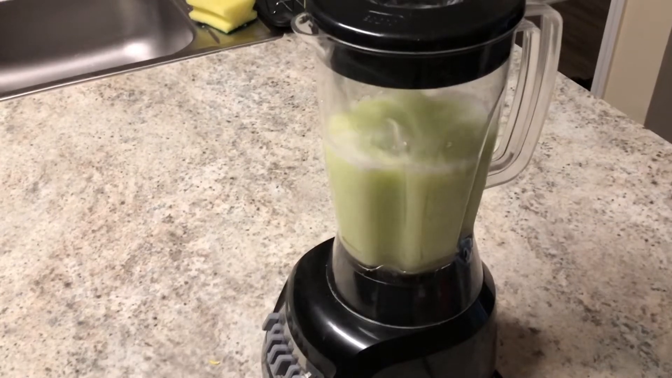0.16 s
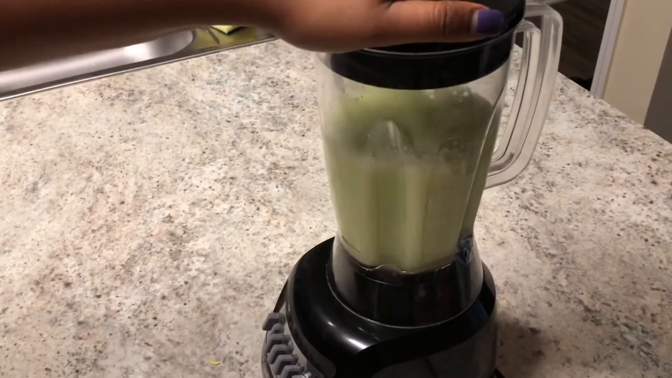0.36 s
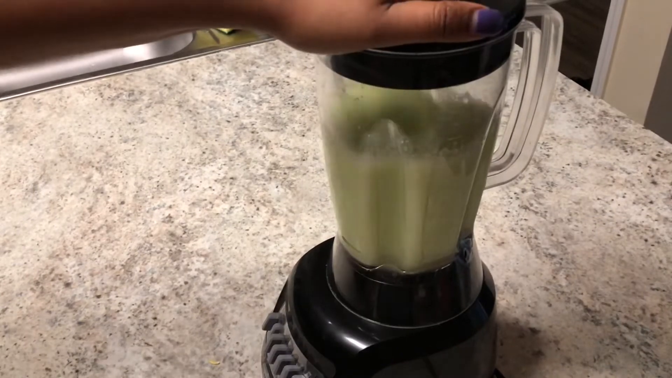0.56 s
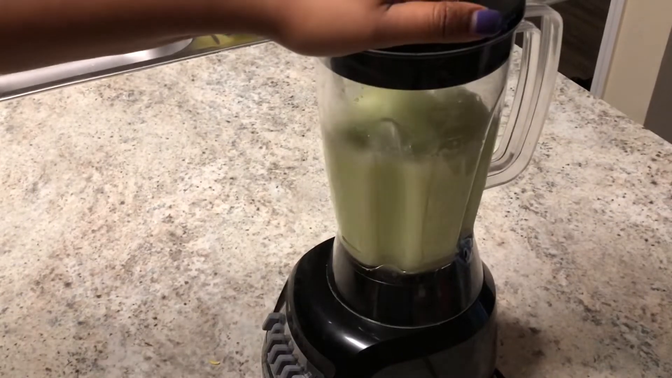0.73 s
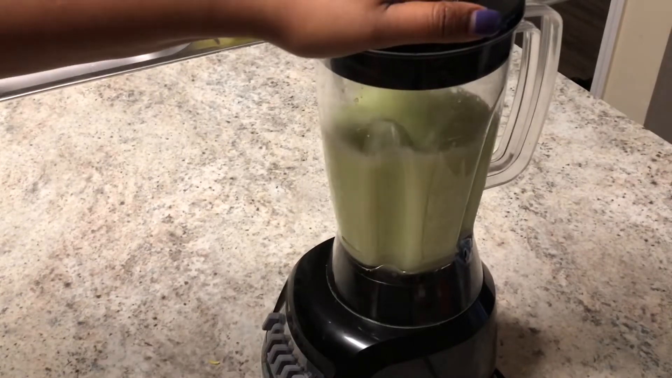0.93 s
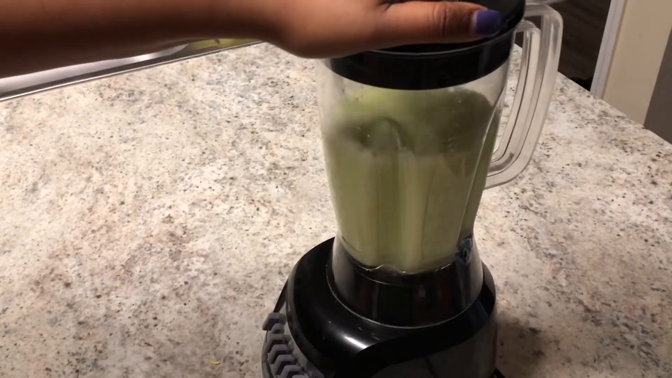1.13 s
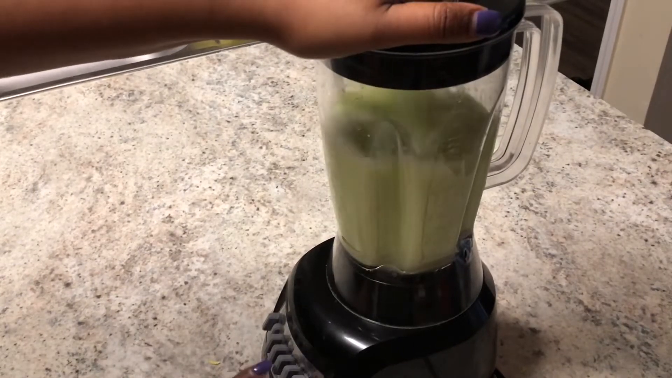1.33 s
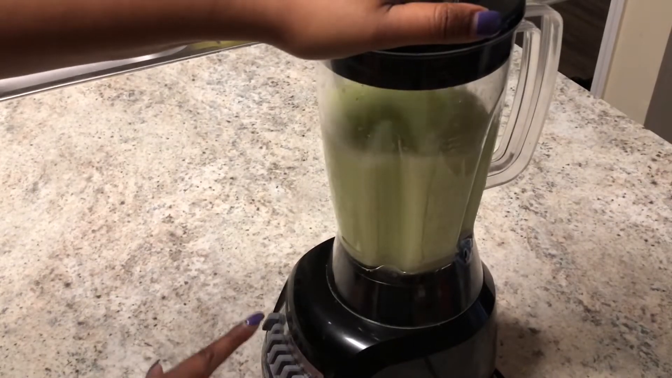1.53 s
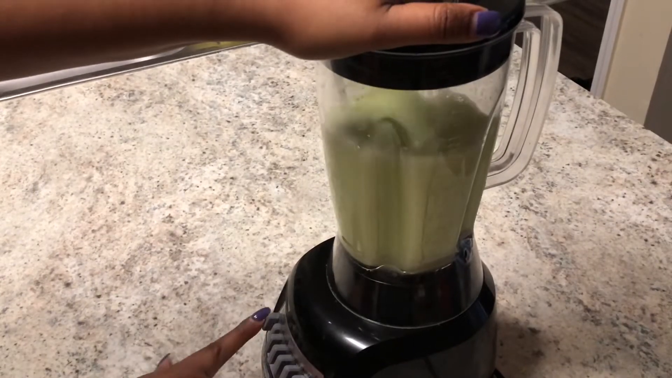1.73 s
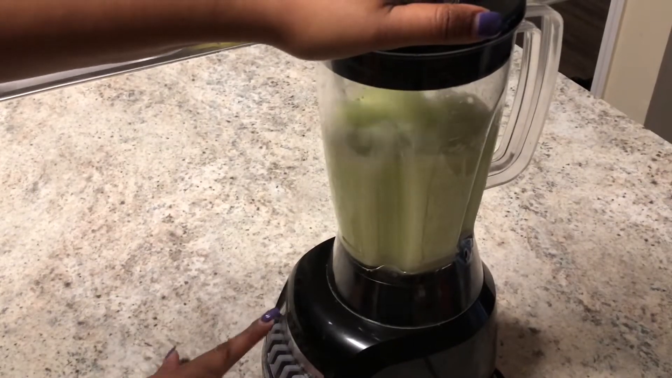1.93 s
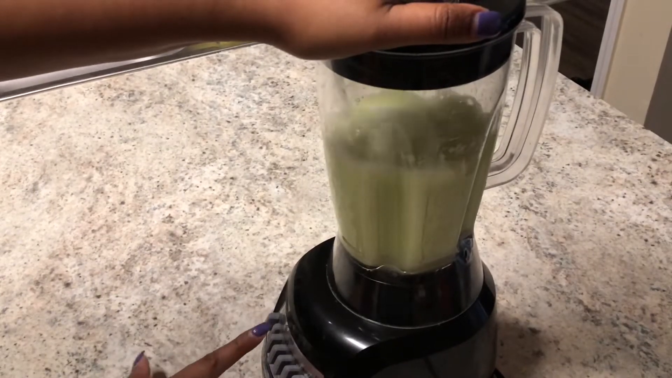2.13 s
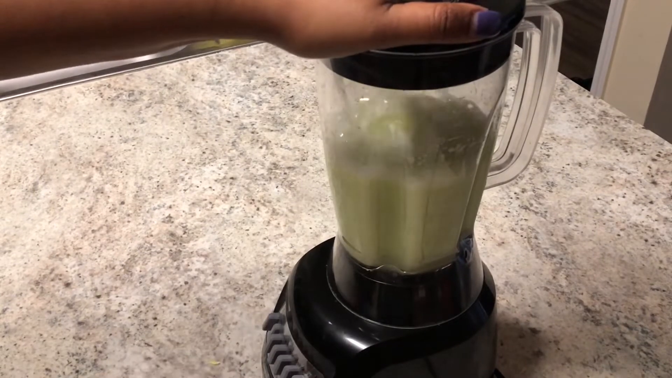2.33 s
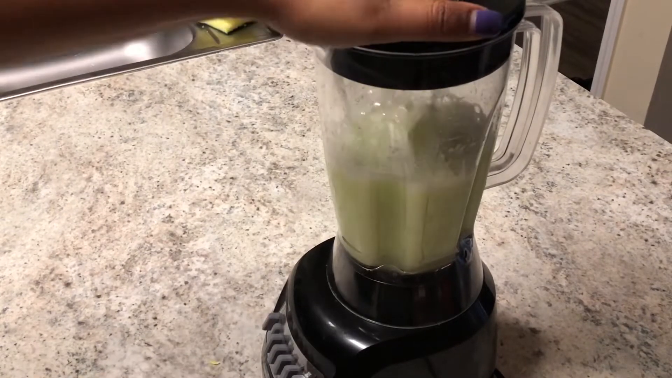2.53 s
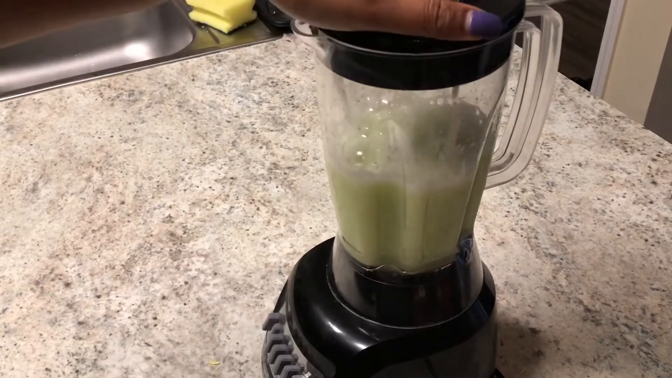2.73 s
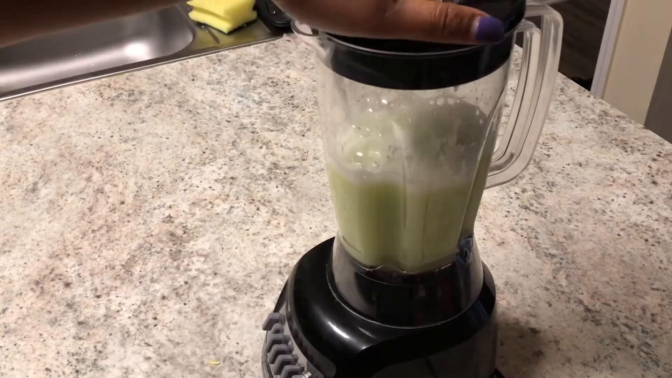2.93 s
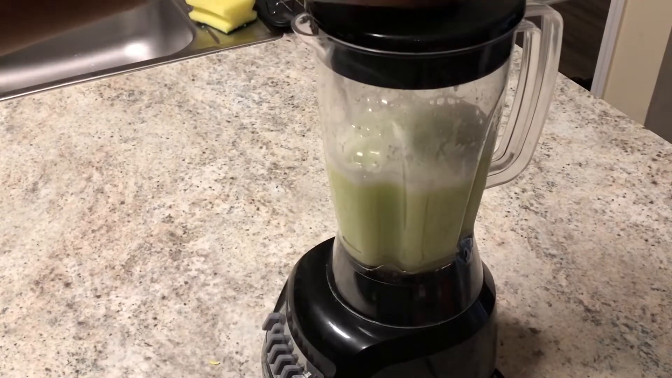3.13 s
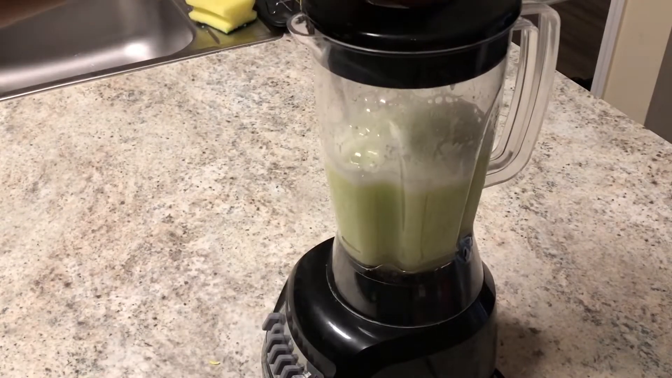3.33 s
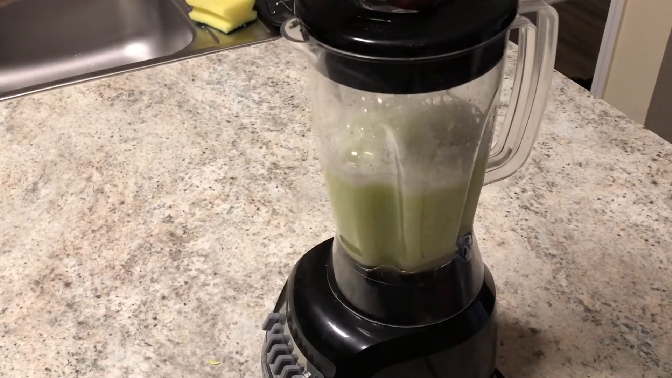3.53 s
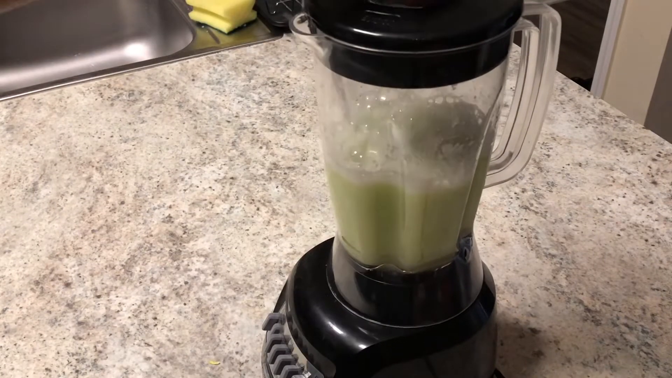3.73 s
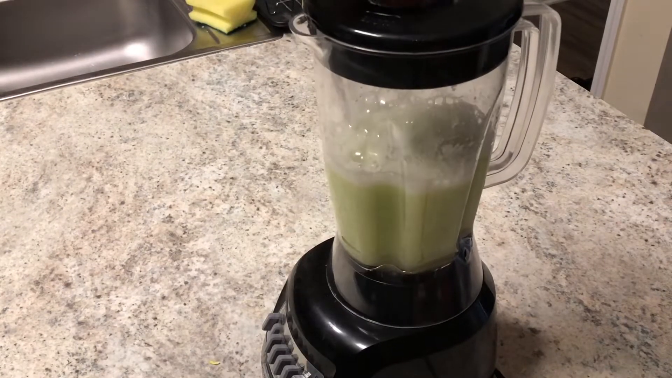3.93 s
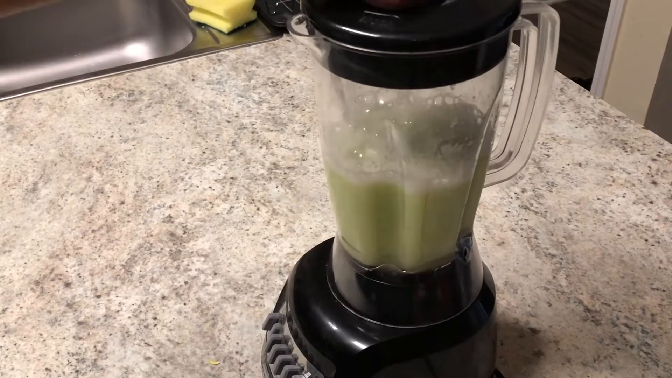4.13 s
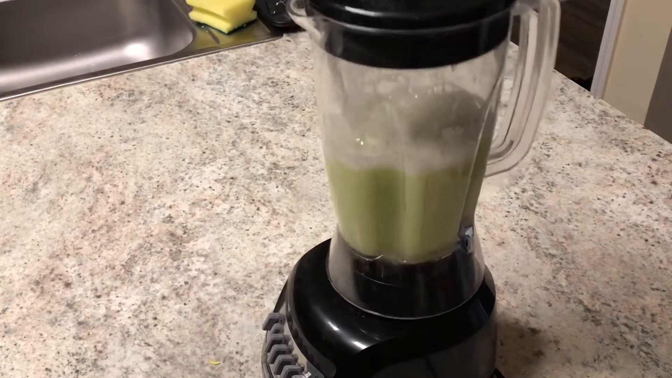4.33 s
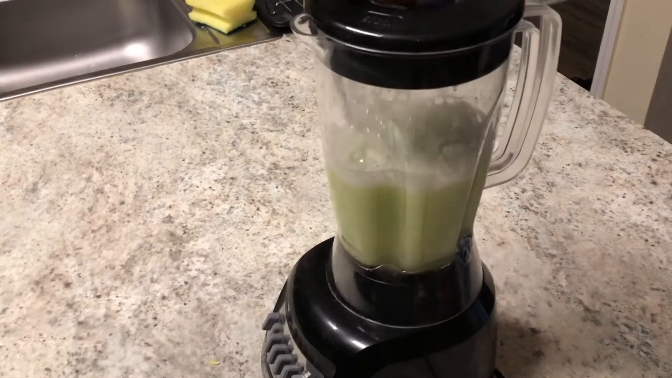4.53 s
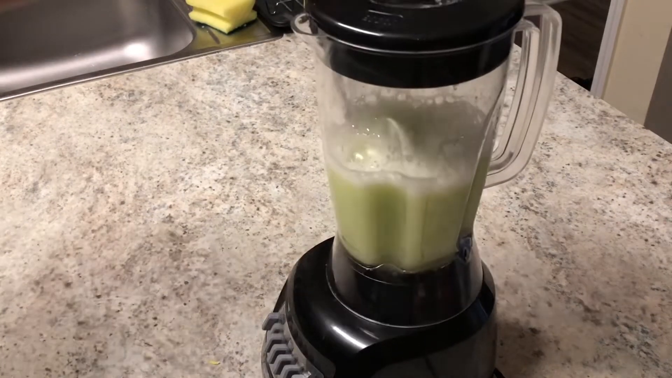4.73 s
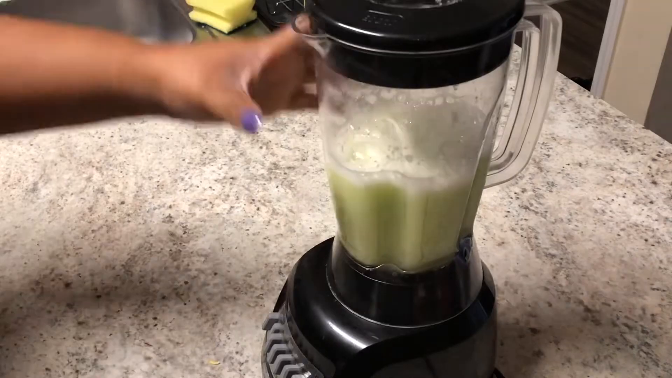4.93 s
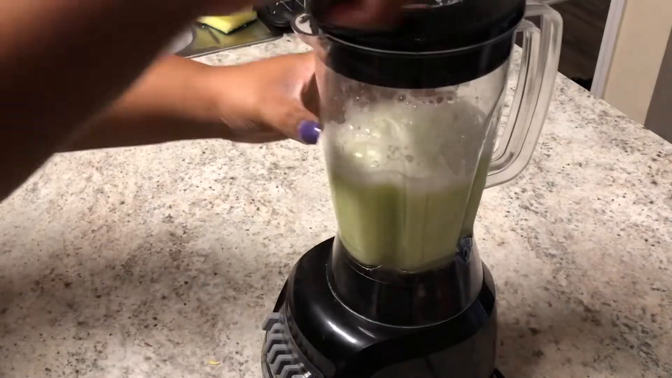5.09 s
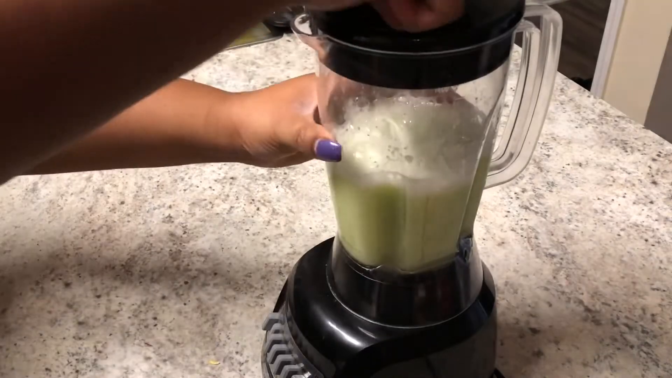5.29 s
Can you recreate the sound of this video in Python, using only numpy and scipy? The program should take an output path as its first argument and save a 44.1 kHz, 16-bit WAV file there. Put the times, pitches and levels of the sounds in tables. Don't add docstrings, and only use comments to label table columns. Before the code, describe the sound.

Silence for about 0.35 s, then a very quick fade into a blender at full speed: a rough motor drone near 400 turns a second with buzzing overtones and a high whine, beneath broad wet churning, spray and fan hiss. The load wavers slightly; tiny celery cracks pepper the jar, a few larger around 0.75-0.97 s. At 1.97 s the off button snaps, bright and very loud. The motor glides steeply down in pitch, brushes scraping, and the base rattles to rest by about 2.5 s. The level drops to faint refrigerator hum and room air. Lid clacks and a hollow knock come around 2.5-2.6 s, light nail ticks near 3.2-3.4 s, busier handling from 3.8 s, with a brief metallic ting. The strongest clunk lands at 4.5 s, followed by small taps, a soft bright rub at 5.1 s and final knocks near 5.2-5.4 s. Close single microphone, short kitchen reverberation.

```python
import sys
import numpy as np
from scipy import signal
from scipy.fft import rfft, irfft, next_fast_len
from scipy.io import wavfile
from scipy.ndimage import uniform_filter1d, map_coordinates

SR = 44100
rng = np.random.default_rng(int(sys.argv[2]) if len(sys.argv) > 2 else 0)


def bounce(signal):
    frames = np.transpose(np.atleast_2d(signal))
    limited = np.clip(frames, -1, 1)
    pcm = np.round(limited * 32767).astype(np.int16)
    wavfile.write(sys.argv[1], SR, pcm)


def decibels_to_gain(level_db):
    exponent = np.asarray(level_db, float) / 20
    return 10 ** exponent


N = 240684

# [t/s, peak level/dB]
SWITCH_OFF = [
    (1.9737, -1),
]
OFF_S = SWITCH_OFF[0][0]
RUN_HZ = 394
TORQUE_HZ = 120
SLOSH_LAW = (-33, 0.75, 1.71)


def unit(x):
    return x / np.sqrt(np.mean(x ** 2) + 1e-20)


def along(points, hz):
    f, v = np.transpose(points)
    return np.interp(np.log(hz + 1), np.log(f + 1), v)


def curves(rows):
    s, *cols = np.transpose(rows)
    return [np.interp(np.arange(N) / SR, s, c) for c in cols]


def wobble(rate_hz):
    knots = rng.standard_normal(int(N * rate_hz / SR) + 4)
    return map_coordinates(knots, [np.arange(N) * rate_hz / SR])


def filtered(x, response):
    m = next_fast_len(len(x) + 8192)
    return irfft(rfft(x, m) * response(np.fft.rfftfreq(m, 1 / SR)), m)[:len(x)]


def band(hz, low_hz, high_hz):
    return 1 / np.sqrt((1 + (low_hz / (hz + 1)) ** 8) * (1 + (hz / high_hz) ** 8))


def rush(response, patchy_db):
    z = signal.stft(rng.standard_normal(N), nperseg=512)[2]
    field = uniform_filter1d(rng.standard_normal(z.shape), size=6, axis=0)
    field = uniform_filter1d(field, size=12, axis=1)
    noise = signal.istft(z * decibels_to_gain(patchy_db * unit(field)), nperseg=512)[1][:N]
    return unit(filtered(noise, response))


def damped(t, t60, low_hz, high_hz):
    noise = filtered(rng.standard_normal(len(t)), lambda hz: band(hz, low_hz, high_hz))
    return decibels_to_gain(-60 * t / t60) * unit(noise)


def ring(t, hz, t60):
    return decibels_to_gain(-60 * t / t60) * np.sin(2 * np.pi * hz * t)


def add(track, s, sound):
    part = track[round(s * SR):][:len(sound)]
    part += sound[:len(part)]


def kitchen(sound, wet_db):
    # [f/Hz, t60/s]
    decay = [(200, 0.16), (1500, 0.18), (4000, 0.15), (8000, 0.12), (14000, 0.07)]
    hz, t, z = signal.stft(rng.standard_normal(SR // 3), SR, nperseg=256)
    tail = signal.istft(z * decibels_to_gain(-60 * t / along(decay, hz)[:, None]), SR, nperseg=256)[1]
    wet = signal.fftconvolve(np.pad(sound, (150, 0)), tail / np.linalg.norm(tail))
    return decibels_to_gain(wet_db) * wet + np.pad(sound, (0, len(wet) - len(sound)))


def coasting():
    drag_s, friction_hz = .5, 106
    since = np.maximum(np.arange(N) / SR - OFF_S, 0)
    return np.maximum((RUN_HZ + friction_hz) * np.exp(-since / drag_s) - friction_hz, 5)


def shaft():
    # [t/s, speed/Hz]
    powered_speed = [(.38, 399), (.43, 400), (.5, 393), (.61, 391), (.68, 397), (.77, 402), (.84, 399),
                     (.91, 393), (1.0, 395), (1.08, 403), (1.16, 402), (1.23, 395), (1.31, 393),
                     (1.44, 401), (1.53, 394), (1.63, 390), (1.78, 402), (1.88, 391), (1.97, 394)]
    time = np.arange(N) / SR
    speed = np.where(time < OFF_S, curves(powered_speed)[0], coasting())
    speed = uniform_filter1d(speed, size=700)
    return speed, 2 * np.pi * np.cumsum(speed) / SR


def flow_db(level_db, load_share, growth):
    # [t/s, load/dB]
    load = [
        (.385, -0.5),
        (.43, 0.5),
        (.6, 0),
        (.82, 0.5),
        (.87, -0.5),
        (1.33, 1),
        (1.52, -1),
        (1.97, -1.5),
    ]
    return level_db + load_share * curves(load)[0] + growth * 20 * np.log10(coasting() / RUN_HZ)


def beat(turn_depth, torque_depth, double_depth):
    time = np.arange(N) / SR
    mains = 2 * np.pi * TORQUE_HZ * time
    torque = torque_depth * np.cos(mains) + double_depth * np.cos(2 * mains)
    return 1 + turn_depth * np.cos(shaft()[1]) + torque * (time < OFF_S)


def room():
    # [f/Hz, level/dB rms]
    fridge = [(118.4, -78), (323.0, -87.5), (651.4, -77.5), (1954, -92), (2439, -100), (2606, -97)]
    # [f/Hz, density/dB per Hz]
    quiet = [(30, -11), (60, -12.5), (85, -10), (105, -12), (140, -12), (200, -7.5), (330, -5), (500, -9.5),
             (650, -7.5), (850, -12.5), (1250, -13.5), (2500, -19.5), (6000, -31.5), (16200, -37.5)]
    # [t/s, half length/s, level/dB, brightness/dB]
    strokes = [(2.598, .08, -73.5, 6), (2.98, .025, -77.5, 6), (3.315, 0.018, -74, 7),
               (3.3, 0.23, -83, -14), (3.432, 0.016, -80, -16), (3.514, 0.033, -72, -4),
               (3.854, 0.086, -75.5, -9.5), (4.23, 0.013, -71, -2), (4.285, .12, -82, -20),
               (4.529, 0.06, -60.5, -10.5), (4.865, .06, -82, -11), (5.071, 0.12, -68, 18.5),
               (5.214, 0.076, -79, -9.5), (5.46, 0.11, -72.5, -7)]
    time = np.arange(N) / SR

    def line(hz, db):
        return decibels_to_gain(db + 7.0 + .8 * wobble(15)) * np.sin(2 * np.pi * hz * time + .25 * wobble(6.3))

    def stroke(lean):
        return sum(decibels_to_gain(db + lean * bright_db) * np.exp(-((time - s) / half_s) ** 2)
                   for s, half_s, db, bright_db in strokes)

    def layer(low_hz, high_hz, patchy_db=2.2):
        return rush(lambda hz: decibels_to_gain(along(quiet, hz)) * band(hz, low_hz, high_hz), patchy_db)

    hum = sum(line(hz, db) for hz, db in fridge)
    air = decibels_to_gain(-70.0) * layer(15, 1200) + decibels_to_gain(-75.5) * layer(1300, 5000) + decibels_to_gain(-79) * layer(5000, 16000)
    rub = stroke(-0.9) * layer(110, 1120)
    rub = rub + stroke(0) * layer(1840, 5000, patchy_db=1.0)
    rub = rub + decibels_to_gain(-3.0) * stroke(0.3) * layer(4900, 16000, patchy_db=2.0)
    return hum + air + rub


def motor():
    # [t/s, level/dB]
    whine_curve = [(.39, -54), (.42, -40), (.6, -41), (.645, -55), (.68, -40), (.8, -45), (.85, -55),
                   (.91, -44), (.99, -53), (1.04, -41), (1.16, -43), (1.3, -43), (1.36, -52), (1.44, -47),
                   (1.5, -54), (1.62, -39), (1.67, -54), (1.82, -52), (1.89, -41), (1.97, -46)]
    # [t/s, pulp unbalance (1st)/dB, blade pair (2nd)/dB]
    low_orders = [(.38, -47.5, -43), (.43, -53, -43), (.56, -38.5, -34), (.65, -48, -50), (.69, -49, -36.5),
                  (.79, -47.5, -41), (.85, -54, -41), (.91, -37.5, -38), (1.0, -50, -39),
                  (1.07, -40.5, -35), (1.16, -44, -39), (1.21, -53, -34.5), (1.29, -40, -33.5),
                  (1.5, -57, -42), (1.6, -35.5, -41), (1.7, -41, -49), (1.8, -42.5, -37),
                  (1.88, -38.5, -42.5)]
    # [order, level re 3rd/dB]
    overtones = [(4, -0.5), (5, -7), (6, -3), (7, -7), (8, -5), (9, -8)]
    # [order, side, level/dB]
    sidebands = [(1, -1, -50), (1, 1, -51), (2, -1, -51), (2, 1, -47), (3, -1, -49)]
    # [order, level/dB]
    coast_orders = [(2, -2), (3, -2), (4, -4), (5, -10), (6, -12), (7, -13), (8, -14), (10, -14)]
    # [f/Hz, level/dB]
    housing = [(70, -80), (96, -68), (107, -67), (125, -58), (154, -62), (181, -54), (196, -44), (212, -42),
               (228, -47), (245, -55), (265, -44), (300, -38), (323, -45), (345, -34), (375, -33),
               (400, -38)]
    # [f/Hz, level/dB]
    shell = [(200, -50), (300, -52), (480, -52), (540, -49), (590, -42), (640, -37), (700, -37), (740, -45),
             (790, -38), (860, -43), (950, -47), (1150, -44), (1400, -48), (1750, -37), (2400, -38),
             (3000, -38), (3700, -27)]
    time = np.arange(N) / SR
    whine_db, = curves(whine_curve)
    first_db, second_db = curves(low_orders)
    speed, turn = shaft()

    def tone(k, shake_rad):
        return np.sqrt(2) * np.sin(k * turn + shake_rad * wobble(29.97))

    def flutter():
        return decibels_to_gain(2.5 * wobble(13))

    def sideband(k, side, db):
        phase = k * turn + side * 2 * np.pi * TORQUE_HZ * time + 0.6 * wobble(25)
        return decibels_to_gain(db) * flutter() ** 1.5 * np.sin(phase)

    first = decibels_to_gain(first_db) * tone(1, .35) * decibels_to_gain(1.3 * wobble(28))
    second = decibels_to_gain(second_db - 1 + 2.2 * wobble(22)) * tone(2, 0.87)
    upper = tone(3, 0.95) * flutter() + sum(decibels_to_gain(db) * tone(k, 1.0) * flutter() for k, db in overtones)
    whine = decibels_to_gain(whine_db - 1 + 2 * wobble(18)) * tone(10, 0.3)
    beats = sum(sideband(*row) for row in sidebands)
    loaded = first + second + decibels_to_gain(-53) * upper + whine + beats

    higher = sum(decibels_to_gain(db + along(shell, k * speed)) * tone(k, 0.045 * k) * flutter() ** 0.43
                 for k, db in coast_orders)
    fading = decibels_to_gain(-14 * np.maximum(time - OFF_S, 0)) * np.clip((2.52 - time) / 0.092, 0, 1)
    free = decibels_to_gain(along(housing, speed)) * tone(1, 0.18) * decibels_to_gain(1.5 * wobble(25)) + fading * higher
    powered = np.clip((OFF_S - time) / .02 + .5, 0, 1)
    return powered * loaded + (1 - powered) * free * np.clip((2.53 - time) / 0.11, 0, 1)


def churn():
    # [f/Hz, density/dB per Hz]
    body_points = [(25, -93), (60, -70), (80, -61), (110, -23.5), (200, -11.5), (334, -9.5), (389, -6),
                   (433, -10), (622, -5.5), (800, -4), (1000, -8), (1290, -20), (1500, -15.5),
                   (1950, -41.5), (3300, -120)]
    slosh_points = [(590, -52.5), (1000, -0.5), (1300, -4), (1560, 0.5), (2130, 0), (3060, -4.5),
                    (3880, -2), (4220, -11), (6000, -10), (7800, -21), (13200, -120)]
    spray_points = [(2650, -41.5), (4500, -2), (5340, -2), (5980, -2.5), (7290, -1), (8300, -5),
                    (10500, -30), (14000, -120)]
    fan_points = [(5500, -120), (7500, -13.5), (9080, -0.5), (9790, 0), (12500, -1.5), (15100, -1),
                  (16200, -14)]
    # [f/Hz, width/Hz, lift/dB]
    jar = [(610, 57, 5.5), (660, 44, 1.5), (710, 30, 0.5), (860, 33, 3.5), (1010, 45, 2.5),
           (2110, 100, 2.5), (2430, 30, 2.5), (2800, 140, 6), (3216, 40, 4), (3480, 120, 2), (4670, 36, 4),
           (5027, 60, 4), (5450, 91, 6), (7100, 320, -1)]

    def lift(hz):
        return decibels_to_gain(sum(db / (1 + (2 * (hz - c) / w) ** 2) for c, w, db in jar))

    def layer(points, patchy_db):
        return rush(lambda hz: decibels_to_gain(along(points, hz)) * lift(hz), patchy_db)

    surge = wobble(40)
    body_db = flow_db(-33, 1.4, 1.14) - 2.5 + 0.73 * wobble(20)
    slosh_db = flow_db(*SLOSH_LAW) + 0.4 * surge + 0.41 * wobble(300)
    spray_db = flow_db(-35, .4, 2.4) + 0.2 * surge + 0.82 * wobble(300)
    fan_db = flow_db(-37, 1.5, 2.1) + 0.4 * wobble(9)
    body = decibels_to_gain(body_db) * layer(body_points, patchy_db=0.0)
    slosh = decibels_to_gain(slosh_db) * beat(.2, .08, .1) * layer(slosh_points, patchy_db=0.5)
    spray = decibels_to_gain(spray_db) * layer(spray_points, patchy_db=1.3)
    fan = decibels_to_gain(fan_db) * beat(.17, .07, 0) * layer(fan_points, patchy_db=1.36)
    return (body + slosh + spray + fan) * np.clip((2.6 - np.arange(N) / SR) / 0.14, 0, 1)


def chunks():
    # [t/s, peak level/dB]
    large = [
        (0.7585, -24),
        (0.9053, -20),
        (0.9316, -24),
        (0.9644, -22),
    ]
    t, cracks = np.arange(160) / SR, np.zeros(N)
    slosh_db = flow_db(*SLOSH_LAW)
    draw = rng.random((420, 3))
    times_s = .36 + 2.2 * draw[:, 0]
    small = [(s, slosh_db[int(s * SR)] + 3.5 - 2.2 * np.log(u + .01)) for s, u in zip(times_s, draw[:, 1])]
    for (s, db), u in zip(list(large) + small, draw[:, 2]):
        hz = 2600 * decibels_to_gain(12 * (u - .5))
        add(cracks, s, decibels_to_gain(db - 0.5 - 60 * t / 0.0016) * np.cos(2 * np.pi * hz * t))
    return cracks


def switch():
    # [f/Hz, level/dB, t60/s]
    button = [(1790, -9, 0.0089), (2000, -6, 0.0099), (3060, -2, 0.011), (3490, -3.5, .01),
              (5340, -3, 0.0058), (5940, 0.5, 0.0059), (6800, -1, 0.006), (9000, -6, 0.0059),
              (11000, -9, 0.006), (12900, -5.5, 0.006), (14000, -6, .005), (14900, -5, .006)]
    out, t = np.zeros(N), np.arange(2000) / SR
    s, db = SWITCH_OFF[0]
    snap = sum(decibels_to_gain(level_db) * ring(t, hz, t60) for hz, level_db, t60 in button)
    snap = snap + decibels_to_gain(-5.5) * damped(t, 0.01, 1403, 2600) + decibels_to_gain(8) * damped(t, 0.0032, 13000, 16500)
    jolt = decibels_to_gain(-29) * ring(t, 35, .05)
    add(out, s, kitchen(decibels_to_gain(db - 7.5) * (snap * (1 - np.exp(-t / 0.00046)) + jolt), wet_db=-9.0))
    rebound = damped(t, .006, 600, 2200) + damped(t, .005, 4500, 7000)
    add(out, s + .0082, decibels_to_gain(db - 7.5 - 12.5) * rebound)
    return out


def brushes():
    # [f/Hz, width/Hz, level/dB]
    holder_modes = [(1720, 70, 2), (2100, 81, 0), (2800, 90, 1), (3200, 90, 0), (4900, 120, -3),
                    (5310, 200, -1), (6470, 120, -6), (7400, 150, -7), (10900, 300, -6), (11600, 300, -10),
                    (13900, 300, -14)]
    time = np.arange(N) / SR

    def holder(hz):
        return np.sqrt(sum(decibels_to_gain(2 * db) / (1 + (2 * (hz - c) / w) ** 4) for c, w, db in holder_modes))

    sharpness = 0.8
    scrape = unit(np.exp(sharpness * np.cos(shaft()[1] + .5 * wobble(40)))) * decibels_to_gain(2.0 * wobble(25))
    free = np.clip((time - OFF_S) / .03, 0, 1) * np.clip((2.47 - time) / 0.15, 0, 1)
    return decibels_to_gain(flow_db(-39.5, 0, 2.1)) * free * scrape * rush(holder, patchy_db=4.0)


def shudder():
    def swell(s, half_s, db):
        return decibels_to_gain(db) * np.exp(-((np.arange(N) / SR - s) / half_s) ** 2)

    shake = swell(2.45, half_s=0.09, db=-59) * rush(lambda hz: band(hz, 110, 310), patchy_db=-1.0)
    rattle = swell(2.41, half_s=0.055, db=-53) * decibels_to_gain(4.4 * wobble(220))
    return shake + rattle * rush(lambda hz: band(hz, 1200, 4000), patchy_db=0)


def touches():
    # [t/s, peak level/dB, top/dB]
    ticks = [(2.7057, -60, -6), (2.713, -58, -12), (3.0335, -56, -12), (3.1794, -77, 6),
             (3.2195, -44.5, -9), (3.292, -44, -14), (3.228, -59, -8), (3.3089, -46, -11),
             (3.369, -62, -12), (3.3776, -53.5, 1.5), (3.2515, -62, -3), (3.398, -67, 9),
             (3.492, -55, -0.5), (3.501, -68, -2), (3.51, -66, -4), (3.835, -40, -13), (3.849, -64, -3),
             (3.888, -72, 4), (4.023, -61, -6), (4.0143, -44.5, -6), (4.166, -60.5, -3), (4.63, -50, -21),
             (4.6807, -53, -5), (4.7333, -60.5, -2.5), (4.807, -51.5, 6), (4.8207, -53, -7),
             (4.8384, -56, -8), (4.866, -60, 2), (5.324, -72, -2), (5.3668, -58.5, -7),
             (5.3806, -55.5, -14), (5.3972, -62, -5), (5.419, -76, 6)]
    # [t/s, peak level/dB, f/Hz, sharp
    # edge/dB]
    clacks = [(2.462, -51, 1720, 8), (2.489, -48, 2040, 9), (2.524, -54, 3700, 0), (2.5885, -55, 1760, 2),
              (2.61, -61, 1310, -3), (2.971, -63.5, 1330, -1), (3.047, -51, 1270, -15),
              (3.0473, -59.5, 2580, -8), (3.249, -53, 2600, -5), (3.272, -49.5, 2380, -12),
              (3.369, -57, 2000, -6), (3.4196, -55, 1620, -9), (3.6511, -61, 1820, 5),
              (3.807, -59, 1510, -8.5), (3.8484, -50.5, 1870, -3), (3.88, -46.5, 2460, -2),
              (3.902, -43.5, 2100, -3), (3.902, -41, 2950, 7.5), (4.03, -49, 1750, 7),
              (4.0575, -53, 2000, -6), (4.084, -56.5, 2040, -4), (4.2263, -51.5, 2000, -11),
              (4.263, -64, 2100, -8), (4.277, -49.5, 2400, 1.5), (4.347, -57, 1200, 2),
              (4.4006, -37.5, 2120, 5.5), (4.3998, -42, 1240, 1), (4.474, -44, 1220, 1),
              (4.4777, -40, 2800, -1), (4.4867, -42, 1000, -6), (4.5093, -30.5, 2260, 8),
              (4.5111, -30.5, 1640, 2), (4.5986, -45, 2100, 4.5), (5.0901, -54, 1950, 1),
              (5.196, -58, 1800, -9), (5.2205, -46, 1810, 1), (5.419, -39, 1290, -27),
              (5.4192, -52, 2600, -15)]
    # [t/s, level/dB, t60/s]
    clasp = [
        (3.219, -77, .25),
        (3.25, -77, .15),
        (3.835, -52, 0.032),
        (3.84, -70, .2),
        (5.399, -80, .1),
    ]
    clasp_hz = (9040, 9115, 9170, 9260)
    out, t = np.zeros(N), np.arange(2000) / SR
    long_t = np.arange(8000) / SR
    nails = [(s, db, top_db, db - 8, 2760) for s, db, top_db in ticks]
    rims = [(s, db + edge_db, -23 - 0.74 * (db + 61), db, hz) for s, db, hz, edge_db in clacks]
    for s, db, top_db, clack_db, hz in nails + rims:
        tick = decibels_to_gain(1.5) * damped(t, 0.0046, 3000, 7850)
        tick = tick + decibels_to_gain(top_db + 9.5) * damped(t, 0.006, 7700, 11000)
        clack = 0.94 * ring(t, hz, 0.013) + 1.27 * damped(t, 0.012, 0.5 * hz, 1.42 * hz)
        contact = (decibels_to_gain(db) * tick + decibels_to_gain(clack_db + 1.5) * clack) * (1 - np.exp(-t / 0.00028))
        add(out, s + .003, decibels_to_gain(db - 28.0) * damped(long_t, 0.15, 2000, 4900))
        add(out, s + .0003, kitchen(contact, wet_db=-10))
    ring_t = np.arange(6000) / SR
    for s, db, t60 in clasp:
        modes = sum(decibels_to_gain(rng.normal(0, 2.1)) * ring(ring_t + rng.random(), hz, 7.5) for hz in clasp_hz)
        add(out, s, decibels_to_gain(db) * modes * decibels_to_gain(-60 * ring_t / t60 + 7.5))
    return out


def knocks():
    # [t/s, peak level/dB, f/Hz, thump/dB]
    contacts = [(2.59, -36, 610, -22), (2.59, -40.5, 460, -24), (2.609, -56, 477, -2.5),
                (3.045, -60, 636, -5), (3.22, -43.5, 756, -32), (3.223, -52, 1090, -32),
                (3.292, -48.5, 610, -32), (3.421, -53, 600, -23), (3.675, -53, 593, -9),
                (3.695, -55, 640, -18), (3.808, -51, 607, -8), (3.833, -52, 680, -22),
                (3.849, -40.5, 565, -16.5), (3.88, -47.5, 677, -14), (4.031, -43.5, 590, -19),
                (4.062, -42, 798, -21), (4.084, -47.5, 650, -15), (4.227, -45.5, 440, -22),
                (4.239, -50, 610, -21), (4.279, -54, 480, -20), (4.319, -43, 375, -21),
                (4.35, -40.5, 640, -19), (4.371, -49, 417, -20), (4.402, -34.5, 610, -31),
                (4.412, -44, 567, -15), (4.425, -46, 517, -19), (4.472, -37, 774, -20),
                (4.477, -31, 376, -26), (4.484, -38, 620, -19), (4.494, -43, 557, -18),
                (4.511, -20.5, 640, -17), (4.511, -29, 970, -33), (4.517, -32.5, 396, -9.5),
                (4.525, -34, 390, -7), (4.537, -43, 630, -16), (4.601, -27, 822, -28),
                (4.616, -42.5, 823, -14), (4.626, -51, 860, -29), (4.636, -47, 860, -17),
                (4.654, -51, 860, -24), (4.668, -49, 860, -25), (4.682, -44.5, 500, -27),
                (4.779, -47, 780, -22), (5.197, -45, 720, -20), (5.201, -46.5, 618, -16),
                (5.207, -47, 630, -20), (5.221, -46, 620, -16), (5.397, -52, 550, -20),
                (5.41, -46, 580, -23), (5.419, -45, 574, -23), (5.432, -54, 564, -23)]
    out, t = np.zeros(N), np.arange(6000) / SR
    for s, db, hz, thump_db in contacts:
        t60 = 0.034 * (600 / hz) ** 0.4
        hollow = ring(t, hz, t60) + 0.49 * damped(t, 0.95 * t60, 0.5 * hz, 0.8 * hz)
        thump = decibels_to_gain(thump_db + 8.5) * ring(t, 198, 0.056)
        knock = decibels_to_gain(db) * (hollow + thump) * (1 - np.exp(-t / 0.00064))
        add(out, s, kitchen(knock, wet_db=-8.5))
    return out


def scene():
    noise = churn() + brushes() + chunks()
    low = filtered(noise, lambda hz: band(hz, 10, 450))
    machine = motor() + low + kitchen(noise - low, wet_db=-9)[:N]
    return np.tile(room() + machine + switch() + shudder() + touches() + knocks(), (2, 1))


def band_limit(x):
    return signal.sosfilt(signal.butter(12, 16990, fs=SR, output="sos"), x)


def record(dry):
    low_hz, top_hz = 69.6, 15820
    silent_until_s, full_s = .345, .381

    def response(hz):
        return (1j * hz / (low_hz + 1j * hz)) ** 4 / np.sqrt(1 + (hz / top_hz) ** 900)

    heard = np.array([filtered(side, response) for side in dry])
    fade = np.clip((np.arange(N) / SR - silent_until_s) / (full_s - silent_until_s), 0, 1)
    return band_limit(heard * fade ** 1.48)


dry = scene()
out = record(dry)
bounce(out)
```